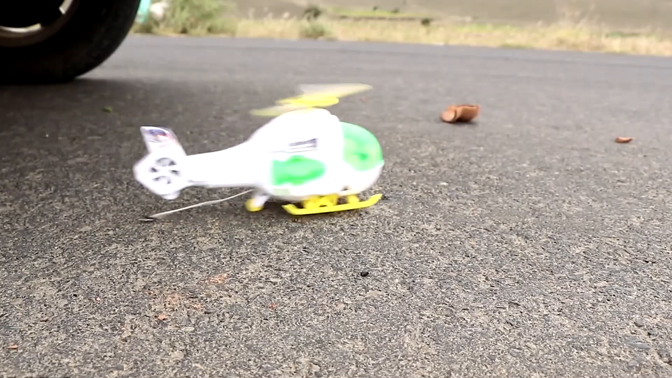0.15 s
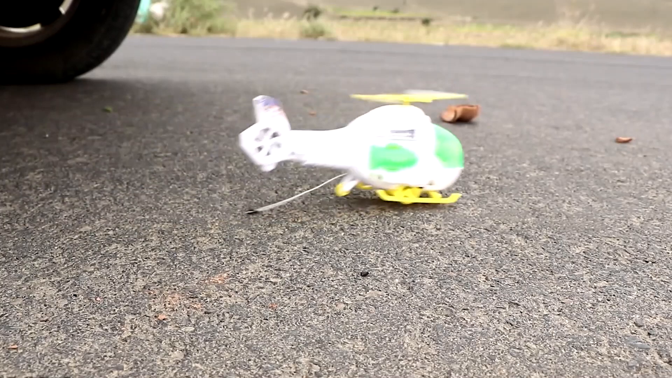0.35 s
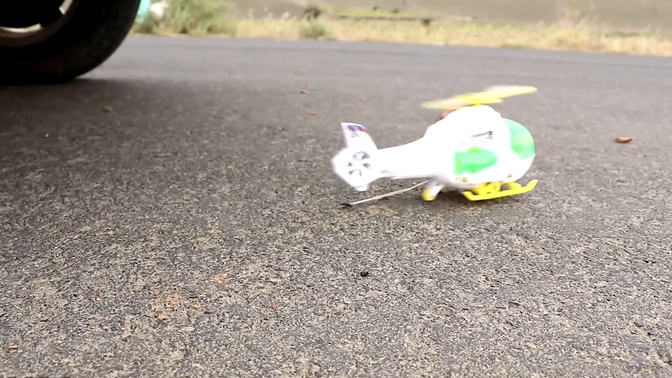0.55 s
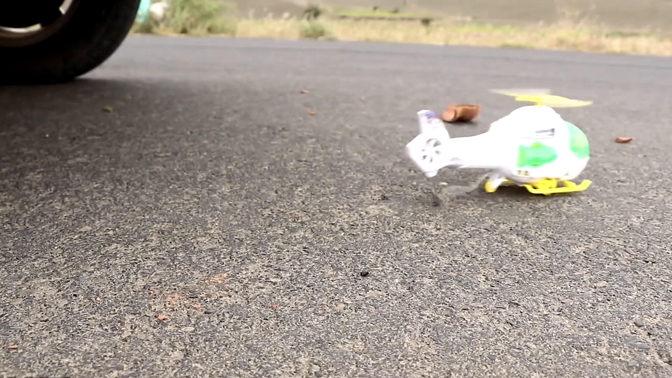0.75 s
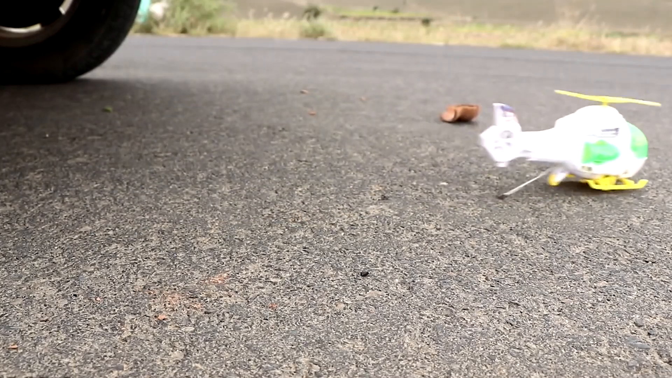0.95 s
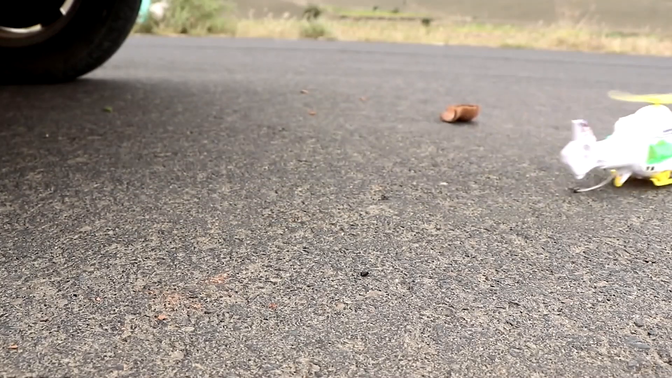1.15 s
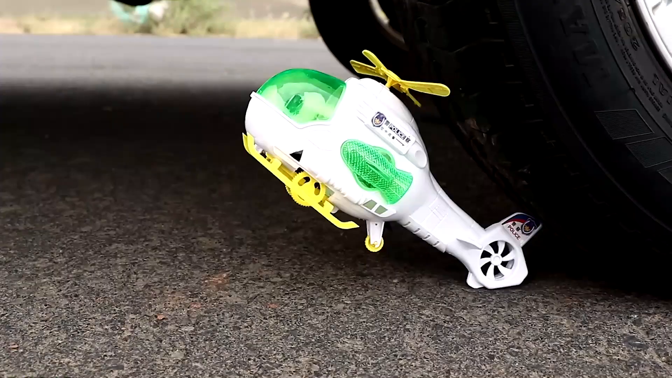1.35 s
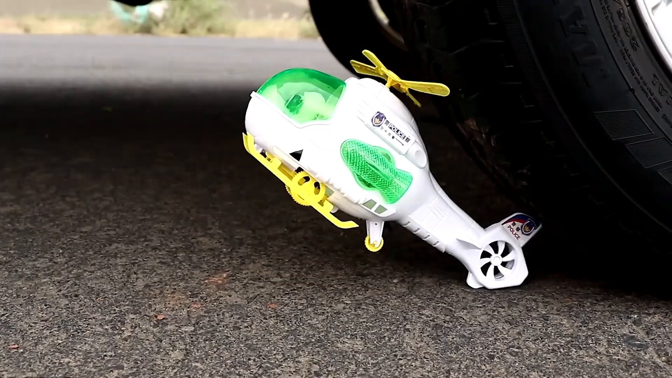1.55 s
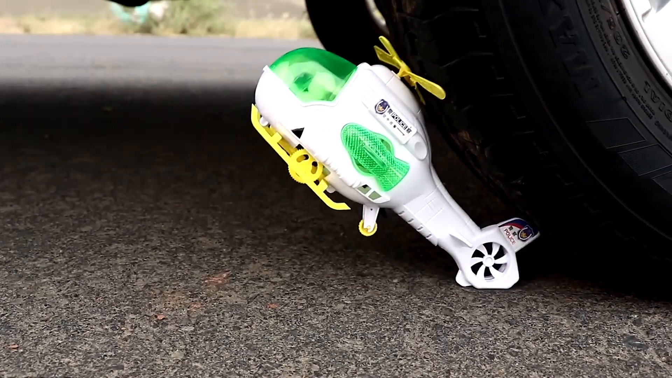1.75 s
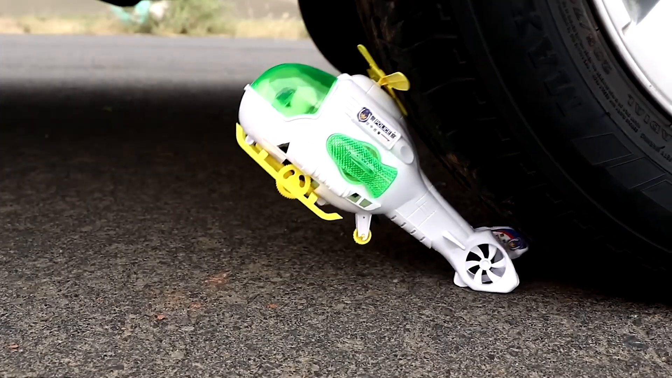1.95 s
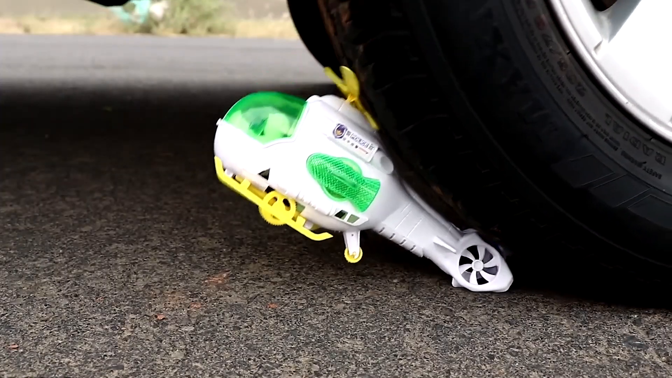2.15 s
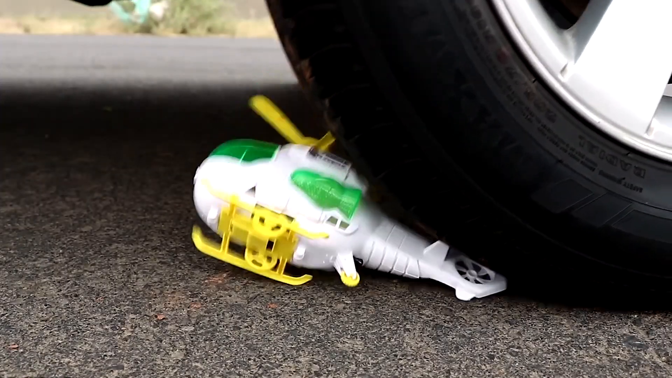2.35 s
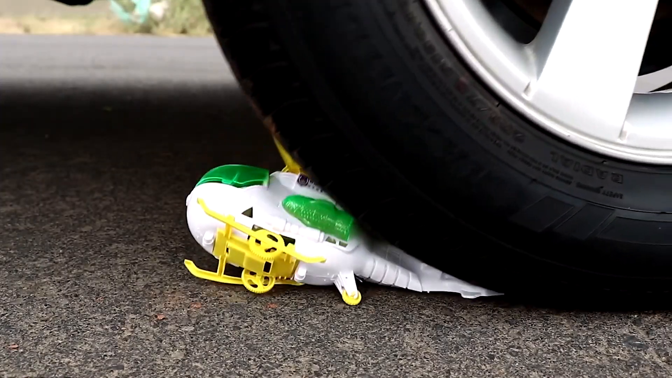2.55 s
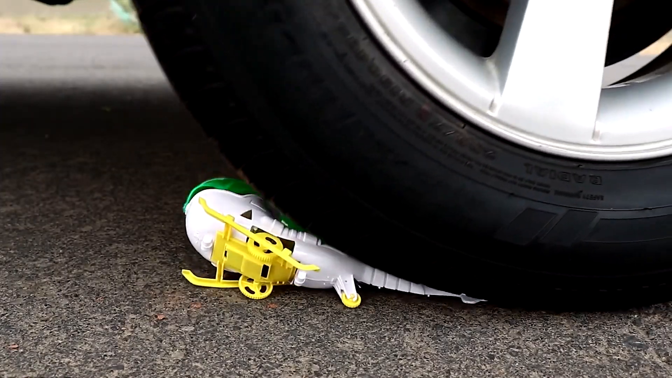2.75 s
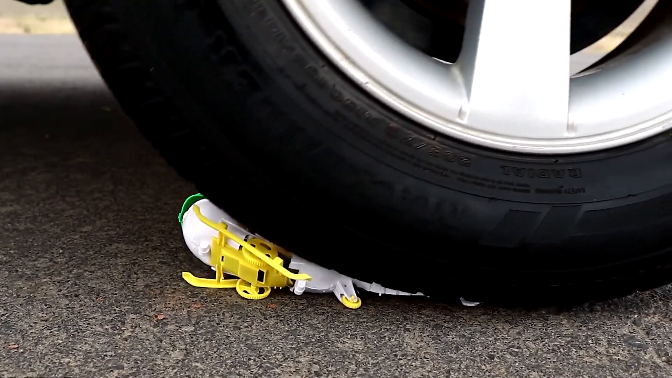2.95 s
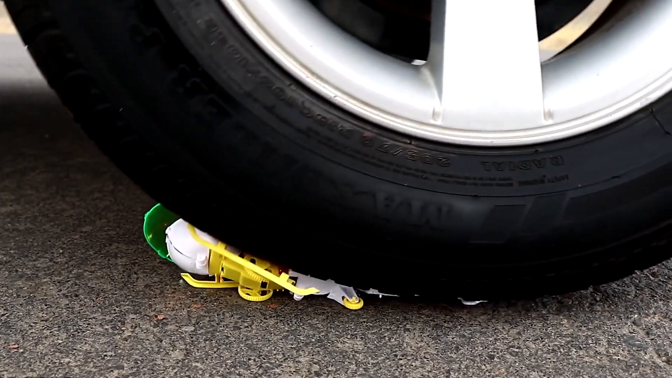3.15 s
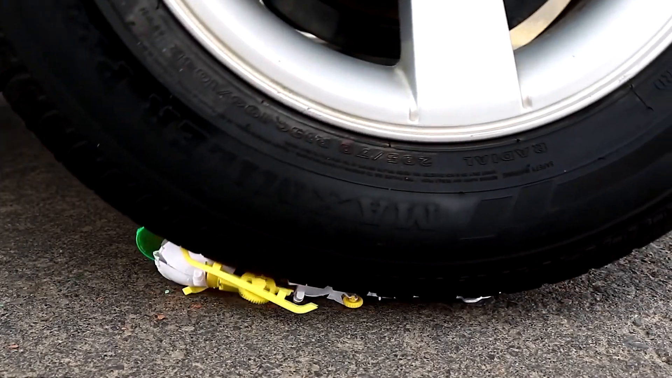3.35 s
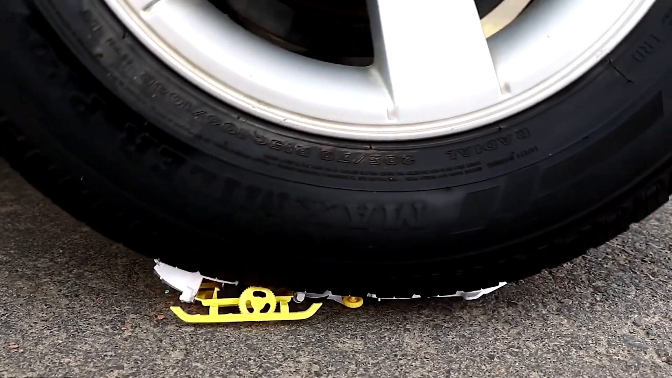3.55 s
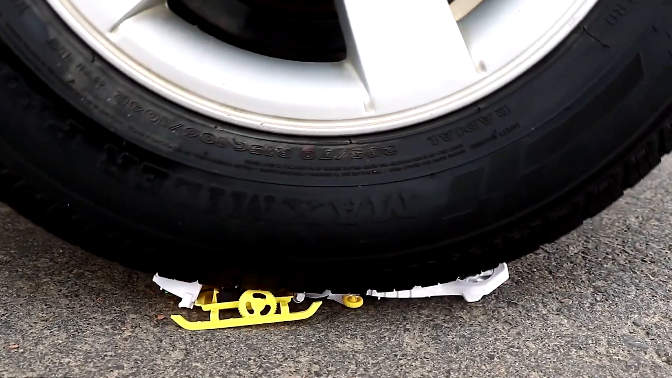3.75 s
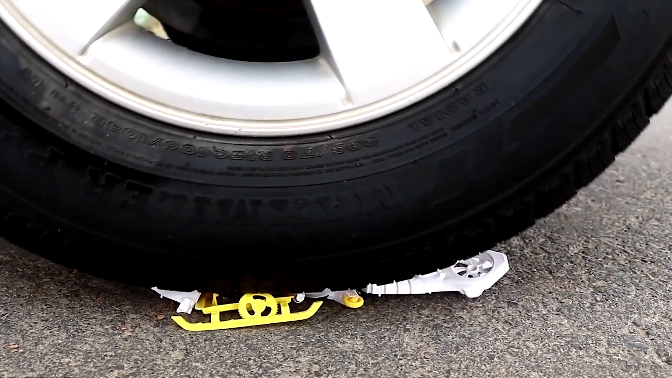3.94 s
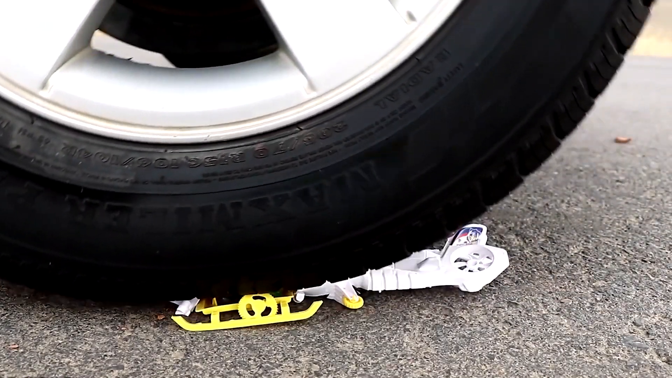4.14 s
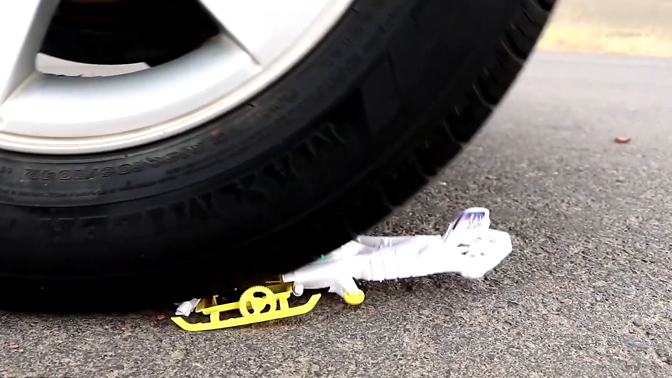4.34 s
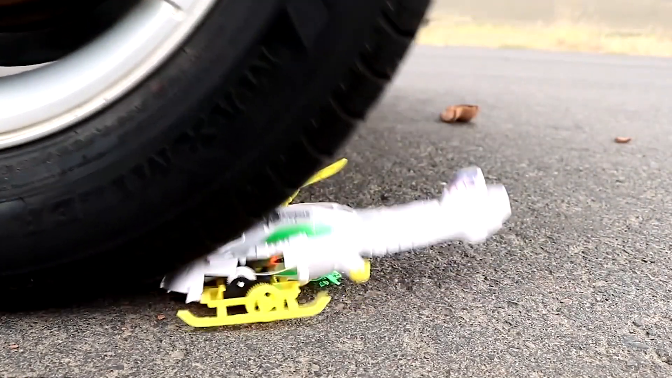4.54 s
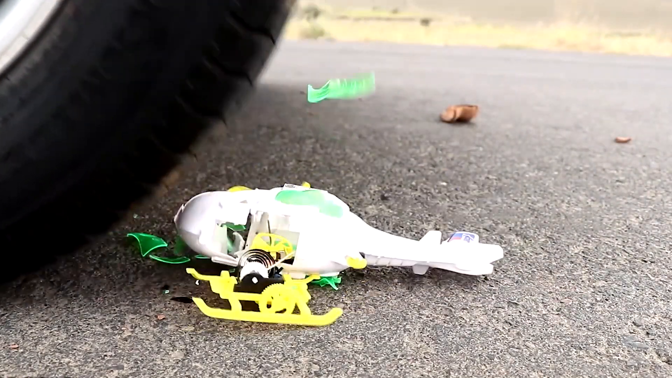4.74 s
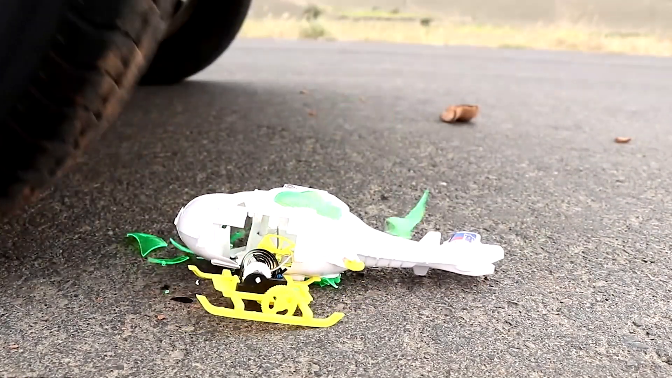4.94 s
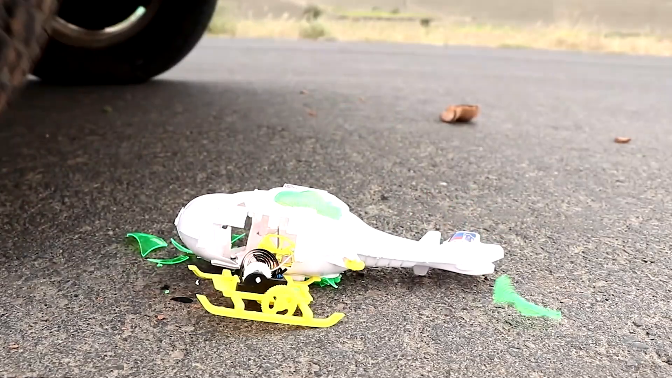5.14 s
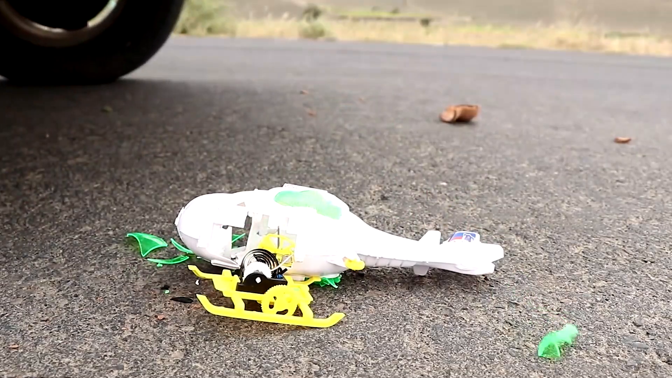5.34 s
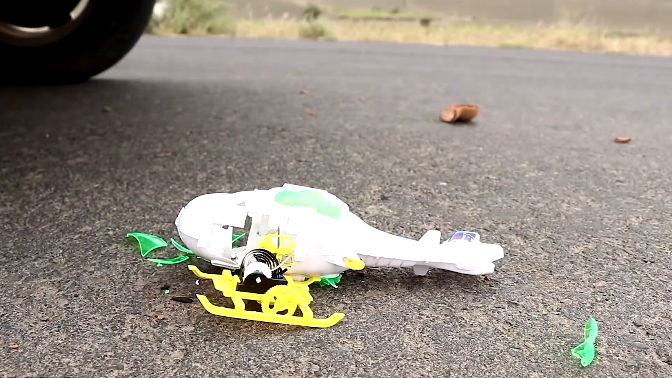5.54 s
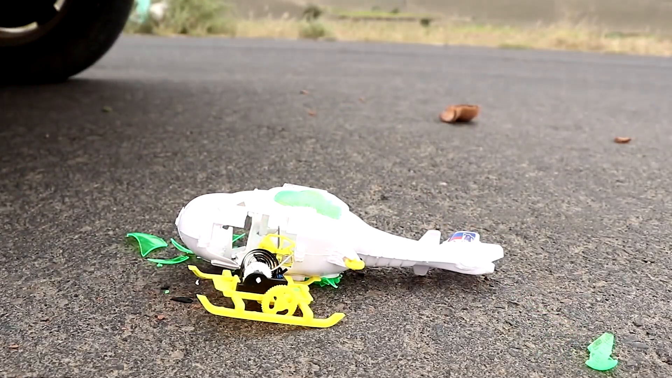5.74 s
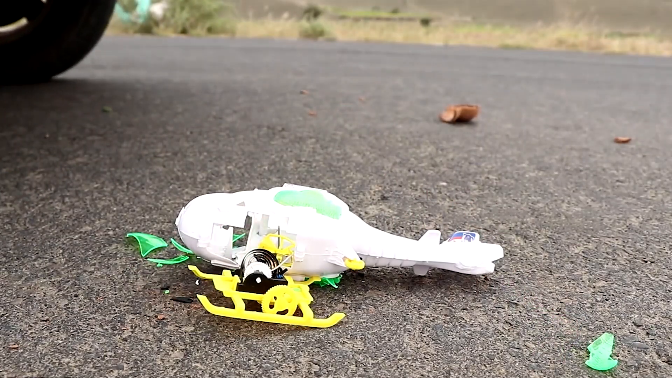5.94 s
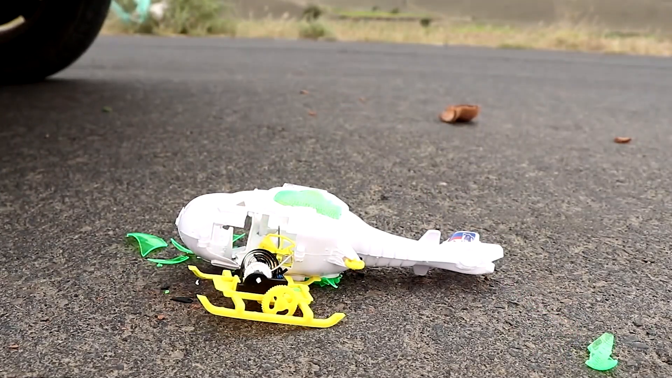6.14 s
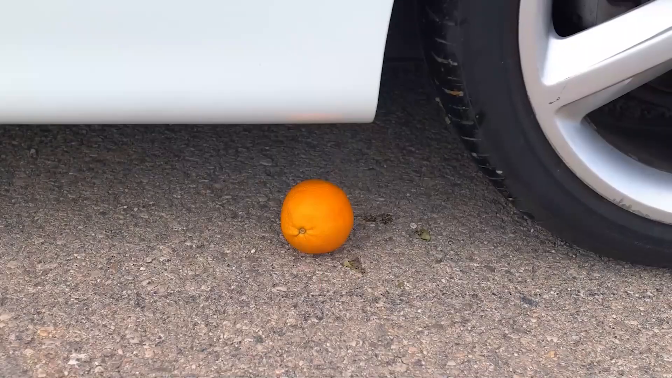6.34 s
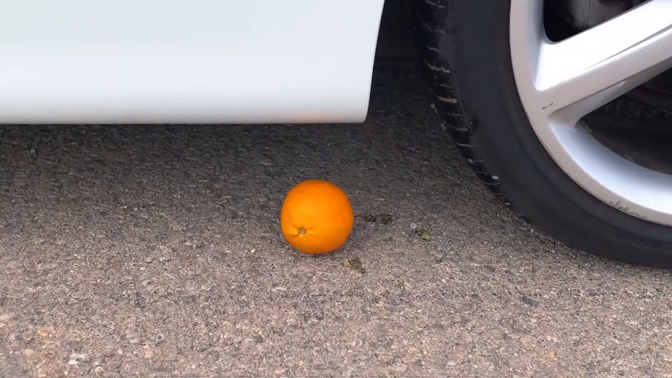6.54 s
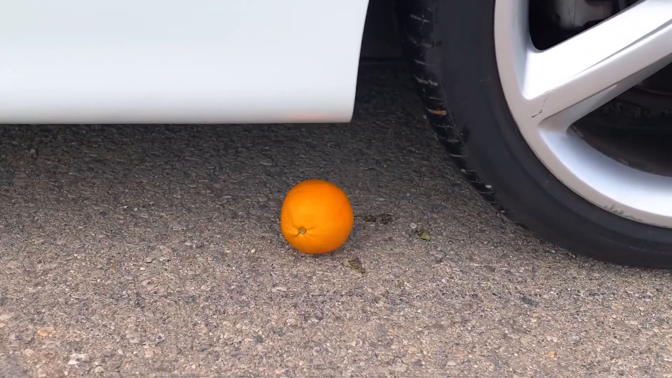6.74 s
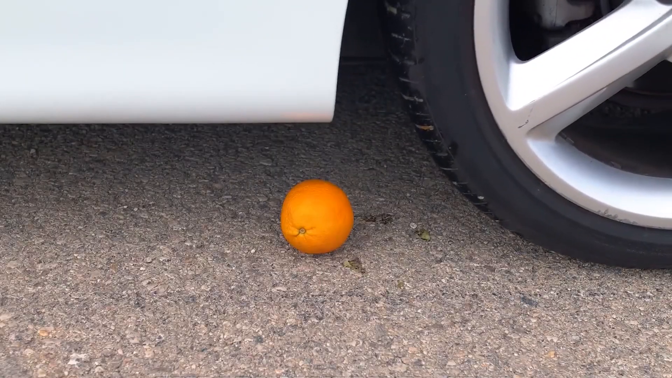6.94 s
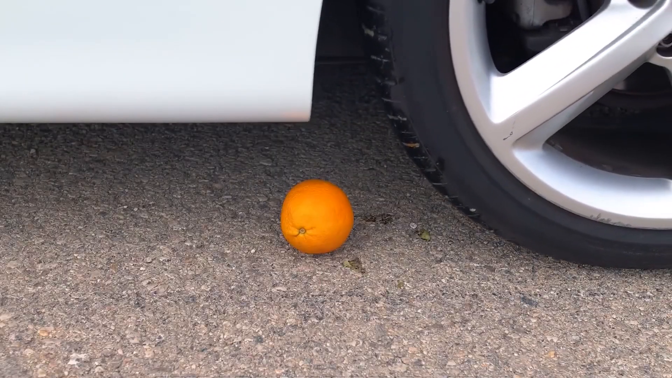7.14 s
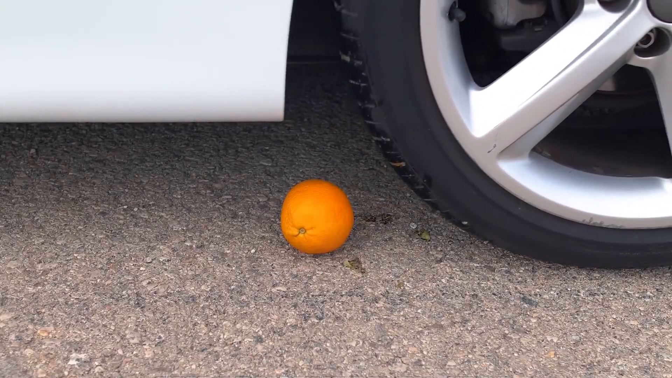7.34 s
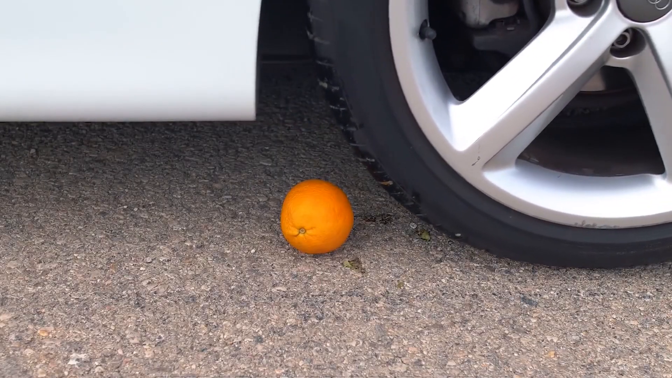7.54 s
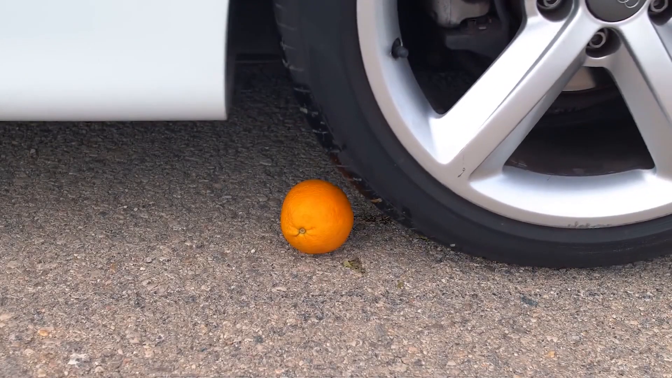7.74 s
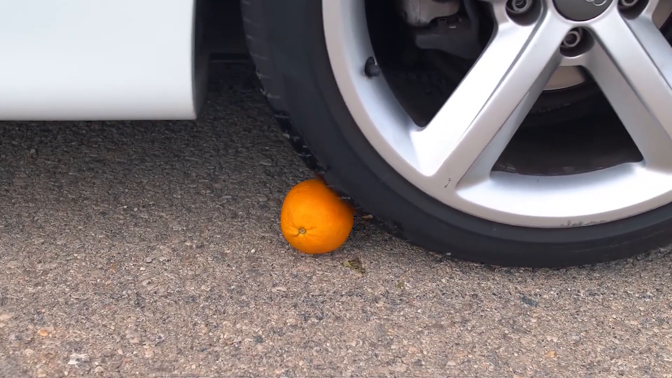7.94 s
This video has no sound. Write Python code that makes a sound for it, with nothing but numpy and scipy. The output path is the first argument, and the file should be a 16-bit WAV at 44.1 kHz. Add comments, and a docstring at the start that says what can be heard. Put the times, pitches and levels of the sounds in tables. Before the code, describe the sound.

Brittle plastic toy crunches and splinters loudly under a car wheel, loose bits ticking on the road, then a low engine hum pulls forward.

```python
"""A toy helicopter rattles and hums over asphalt in gusty air beside an idling car, and stops. The car creeps
onto it: the hollow shell cracks as noise snaps and dying modes, grinds and sheds pieces. A shard skitters off
as ringing ticks, the brake squeaks as a short sine, gusts rumble as low noise. After a sharp ringing snap in
mono comes a short silence, then a second scene: another car pulls forward. Its firing harmonics swell in over
whine and road noise, grit pops, and the firing rate sags."""
import sys
import numpy as np
from scipy import signal
from scipy.fft import rfft, irfft, next_fast_len
from scipy.io import wavfile
from scipy.ndimage import uniform_filter1d

SR = 44100
rng = np.random.default_rng(int(sys.argv[2]) if len(sys.argv) > 2 else 0)


def put_to_file(sound):
    """Save the sound as 16-bit audio at rate SR, in the file named by the first command-line argument."""
    columns = np.atleast_2d(sound).T  # one column per channel
    safe = np.clip(columns, -1, 1)
    whole_steps = np.round(safe * 32767)
    wavfile.write(sys.argv[1], SR, whole_steps.astype(np.int16))


N = 356769
TIME = np.arange(N) / SR  # s

# Cracks of the shell, and as last row a sharp mono snap just before the silence. Each row: start in seconds,
# level in dB, snap decay in seconds, # sharpness in dB (dull split below 0, thin splinter above).
CRACKS = [(1.9302, -34, 0.027, -4), (1.9715, -18.5, 0.0039, -3.5), (2.1688, -26, 0.0031, 0.5),
          (2.281, -10.5, 0.0037, 6), (2.4085, -9, 0.011, 0.5), (2.4865, -8, 0.003, -4),
          (2.5477, -7, 0.0026, 2.5), (2.6238, -6, 0.0013, -3), (2.6498, -5, 0.0042, -0.5),
          (2.6739, -3.5, 0.005, -5), (2.6845, -5, 0.0054, 3.5), (2.6922, -7, 0.0022, -3),
          (2.7095, -23, 0.0014, -2), (2.7208, -4, 0.0038, -1), (2.7484, -3.5, 0.0029, -1.5),
          (2.7741, -6.5, 0.00091, 1), (2.7833, -3.5, 0.0045, -1.5), (2.8082, -3.5, 0.0046, 6.5),
          (2.8406, 0, 0.0072, -2), (2.9088, -7, 0.00047, 0.5), (2.9288, -4, 0.0015, 1),
          (2.9487, -10.5, 0.0035, 4), (2.9884, -8, 0.0014, 0.5), (3.0483, -5, 0.0029, 8.5),
          (3.098, -1.5, 0.018, 3.5), (3.173, -1.5, 0.0013, 1), (3.203, -9.5, 0.0015, -3),
          (3.232, -9.5, 0.0072, 5), (3.2906, -1, 0.0086, 4), (3.4079, -7.5, 0.003, 3),
          (3.418, -5, 0.0024, -2), (3.4286, -8, 0.027, 2.5), (3.4594, -4.5, 0.0091, -1),
          (3.484, -2, 0.014, 6.5), (3.5629, -3.5, 0.0075, 1.5), (3.58, -13.5, 0.00059, -2.5),
          (3.6216, -12.5, 0.00071, 3.5), (3.6537, -5, 0.0034, 3), (3.6667, -5, 0.0011, 0),
          (3.7526, -16.5, 0.0025, 4.5), (3.8782, -3, 0.0037, -1), (3.963, -0.5, 0.001, 1.5),
          (3.9916, -4.5, 0.00025, 3), (4.0237, -8, 0.00067, 4.5), (4.1237, -7, 0.0085, 3.5),
          (4.162, -3.5, 0.0016, 4), (4.47, -21, 0.0025, 15), (4.4941, -14, 0.0026, -0.5),
          (4.5253, -14.5, 0.00078, 5.5), (4.7201, -19.5, 0.0058, -1), (4.9994, -24, 0.0037, -2),
          (6.29, -15.5, 0.009, 5.5)]
# Shell spectrum. Each row: frequency in Hz, relative level in dB.
SHELL_SPECTRUM = [(60, -11.5), (480, -7), (1100, -3.5), (1900, -3.5), (3300, -1.5), (4800, -7), (7500, -3),
                  (11000, -8.5), (16000, -17)]
# Modes of the buckling shell. Each entry: frequency in Hz.
SHELL_MODES_HZ = [470, 1090, 1890, 2270, 2960, 7050]
# Stretches of grinding under the tyre. Each row: start in seconds, length in seconds, level in dB.
GRINDS = [(2.426, 0.034, -21), (2.665, 0.2, -16), (3.1, 0.03, -18), (3.417, 0.06, -25), (3.986, 0.082, -33),
          (4.486, 0.071, -48), (4.689, 0.12, -37)]
# Pieces scraping on asphalt. Each row: frequency in Hz, relative level in dB.
SCRAPE_SPECTRUM = [(100, -22.5), (500, -4), (1200, 0.5), (3300, 6.5), (4800, -4), (7500, 2.5),
                   (11000, -5.5), (16000, -22)]
# Hollow knocks as the body buckles or springs back. Each row: start in seconds, level in dB.
THUDS = [(2.282, -22), (3.1, -12.5), (3.431, -16.5), (3.963, -5), (4.125, -9)]
# Loose pieces clicking on asphalt. Each row: start in seconds, level in dB.
DEBRIS = [(2.2605, -24), (2.3717, -25.5), (3.7258, -25.5), (3.8017, -24), (3.868, -28), (4.064, -22.5),
          (4.2396, -21), (4.266, -25), (4.3606, -27), (4.367, -21), (4.378, -24.5), (4.515, -17.5),
          (4.559, -26.5), (4.615, -25), (4.7835, -26)]
# Splinters springing free, and the ring of the last mono snap. Each row: start in seconds, level in dB, T60 in
# seconds, three modes in Hz.
PINGS = [(4.9994, -23, 0.033, 2030, 2690, 3100), (6.2914, -20, 0.05, 3900, 5620, 8200)]
# Knocks of the rolling toy. Each row: start in seconds, level in dB.
KNOCKS = [(0.072, -28.5), (0.198, -28.5), (0.24, -30), (0.308, -27), (0.341, -28.5), (0.399, -26.5),
          (0.586, -27), (0.639, -30), (0.833, -23.5), (0.93, -32), (0.997, -30), (1.123, -28), (1.229, -30),
          (1.288, -37), (1.354, -31), (1.402, -30.5), (1.428, -34)]
# Toy spectrum. Each row: frequency in Hz, relative level in dB.
TOY_SPECTRUM = [(100, -13), (400, -4), (1050, 1), (1700, -5.5), (3200, -10), (4800, -23.5), (8000, -21),
                (16000, -52.5)]
# Modes of the intact toy. Each entry: frequency in Hz.
BODY_MODES_HZ = [1047, 3117]
# Bounces of the shard. Each row: start in seconds, level in dB, brightness in dB.
BOUNCES = [(5.055, -45, 4.5), (5.215, -40.5, -8.5), (5.344, -51, 15), (5.361, -51, 15.5), (5.44, -58.5, 19),
           (5.696, -59, 23), (5.804, -58, 11.5)]
# Modes of the shard. Each row: frequency in Hz, relative level in dB, T60 in seconds.
SHARD_MODES = [(2990, 1, 0.08), (3690, 4.5, 0.07), (7310, -5, 0.048), (8700, 1, 0.034), (10380, 0, 0.045),
               (12200, -6.5, 0.054)]
# Resonances of the second car's exhaust. Each row: frequency in Hz, relative level in dB.
EXHAUST_SPECTRUM = [(54, -12), (108, -0.5), (160, -9), (205, -6.5), (232, -7), (256, -23), (290, -8),
                    (306, -0.5), (325, -19.5), (650, -23)]
# Second car's road noise. Each row: frequency in Hz, relative level in dB.
ROAD_SPECTRUM = [(250, -8.5), (750, -12), (1400, -12), (2700, -17.5), (6200, -22), (7800, -25),
                 (10200, -24), (11500, -32), (16000, -37.5)]
# Second car's whine. Each row: frequency in Hz, level in dB.
DRIVE_WHINE = [(1270, -49), (2012, -52.5), (5040, -59.5)]
# Grit popping under the second car. Each row: start in seconds, level in dB.
PEBBLES = [(6.951, -15), (7.355, -9.5)]
# Grit pop spectrum. Each row: frequency in Hz, relative level in dB.
POP_SPECTRUM = [(150, -22), (600, 8), (2500, -1), (4200, -32)]
# First car's low tones. Each row: frequency in Hz, level in dB.
IDLE_TONES = [(75.4, -52), (102.3, -56.5), (452, -64)]
# First car's fan whirr. Each row: frequency in Hz, relative level in dB.
WHIRR_SPECTRUM = [(25, -3), (110, -0.5), (330, -8), (450, -4), (850, -13), (1200, -8), (4800, -23.5),
                  (16000, -35)]
# First car's belt whine. Each row: frequency in Hz, level in dB.
BELT_WHINE = [(614, -57), (1125, -64.5), (1658, -61)]
# Gusts on the microphone. Each row: centre in seconds, level in dB.
GUSTS = [(.32, -38), (1.03, -36.5), (1.14, -37.5), (1.29, -35.5), (1.6, -36), (1.83, -35), (1.98, -37),
         (2.06, -35), (5.85, -41), (6.08, -37.5), (6.23, -42)]
# Stereo width. Each row: frequency in Hz, side against mid in dB.
WIDTH = [(30, -8), (200, -15.5), (1200, -6.5), (2300, -3.5), (4200, -0.5), (9000, 1)]

TOY_END_S, MONO_S, CUT_OUT_S, CUT_IN_S = 1.475, 6.285, 6.317, 6.348
EDGE_HZ = 16000
STRIKE_DB, RIPPLE_DB = 4, 3.5  # random spread of mode strengths and of crack spectra
# uneven tearing: spread in level, length of a jerk
JERK_DB, JERK_S = 4, .0012
# panels break ever smaller around the cave-in, ringing higher and brighter
CAVE_S, CAVE_SPREAD_S = 2.9, 0.35
WHOLE_PANEL_HZ, BROKEN_PANEL_HZ = 1400, 2400
WHOLE_TREBLE_DB, BROKEN_TREBLE_DB = -8, 2
SHARP_OCTAVES_PER_DB = 0.21  # sharper cracks: smaller pieces, higher ring
AFTERCRACK_SHARE, AFTERCRACK_DB = 0.59, -19.5
AFTERCRACK_MEAN_DELAY_S, AFTERCRACK_DECAY_S = 0.012, 0.0015
GRIND_ATTACK_S, GRIND_SAG_DB_PER_S, GRIND_RELEASE_S = 0.032, 47.5, 0.019
TOUCH_S, LEAVE_S, TOUCH_FADE_S, TOUCH_DB = 2.6, 4.7, 0.22, -50.5
CREASES_PER_S = 170
DEBRIS_T60_S = .014
FREE_HZ, LOADED_HZ, SAG_S, SAG_SPREAD_S = 57.6, 50.2, 7.57, 0.071  # firing rate
DRIVE_DB, SWELL_DB, SWELL_S, LOADED_DB = -34.5, -6, 0.21, -1.5
WAVER_DB, WHINE_WIDTH_HZ = .9, 20
BRAKE_S = 5.845
IDLE_DB, IDLE_NEAR_S, IDLE_FADE_DB_PER_S = -45.5, 3.06, 2
GUST_S, BREEZE_DB, BREEZE_END_S = .033, -48, 2.19


def cracks(ring_db=6, ring_width=0.41, lower_ratio=0.52, lower_db=1.5, first_db=4, first_s=0.0016,
           recoil_db=-21, recoil_s=0.017, flex_t60_s=0.013, modes_db=-24, modes_t60_s=0.05, size=2048):
    """Each fracture is a sharp snap, a short tear and a panel's recoil; the hollow shell rings on briefly."""
    out = np.zeros((2, N))
    t = np.arange(3 * size) / SR
    hz = abs(np.fft.fftfreq(size, 1 / SR))
    ripple_hz = np.geomspace(200, 16000, 170)
    for s, db, snap_s, sharp_db in CRACKS + small_cracks():
        broken = ease(s, CAVE_S, CAVE_SPREAD_S)
        panel_hz = WHOLE_PANEL_HZ * (BROKEN_PANEL_HZ / WHOLE_PANEL_HZ) ** broken
        ring_hz = panel_hz * 2 ** (SHARP_OCTAVES_PER_DB * sharp_db)
        treble_db = WHOLE_TREBLE_DB + (BROKEN_TREBLE_DB - WHOLE_TREBLE_DB) * broken + sharp_db

        first = amp(first_db) * np.exp(-t / min(first_s, snap_s))
        snap = np.maximum(np.exp(-t / snap_s), first)
        jerks = unit(uniform_filter1d(rng.standard_normal(len(t)), round(JERK_S * SR)))
        uneven = amp(JERK_DB * np.clip(jerks, -2, 1) * (1 - np.exp(-t / first_s)))
        recoil = amp(recoil_db) * np.exp(-t / recoil_s)
        envelope = np.hypot(snap, recoil) * uneven

        # dull splits lose bass and treble
        tilt = [(450, 2 * min(sharp_db, 0)), (1000, 0.0048), (2700, 0), (6500, treble_db)]
        # main mode and a lower partner
        modes = [(ring_hz, ring_db), (lower_ratio * ring_hz, lower_db)]
        panel_db = sum(peak_db / (1 + ((hz / mode_hz - 1) / ring_width) ** 2) for mode_hz, peak_db in modes)
        ripple_db = RIPPLE_DB * np.interp(hz, ripple_hz, rng.standard_normal(len(ripple_hz)))
        signs = rng.choice([-1., 1.], (2, len(t)))
        burst = colour(signs * envelope, SHELL_SPECTRUM, read(tilt, hz) + panel_db + ripple_db)
        add(out, s, amp(db) * unit(burst) * np.sqrt(np.mean(envelope ** 2)))
        add(out, s, ring([ring_hz], db, flex_t60_s))
        shell_db = db + modes_db + read(tilt, np.array(SHELL_MODES_HZ))
        add(out, s, ring(SHELL_MODES_HZ, shell_db, modes_t60_s, STRIKE_DB))
    return out * amp([[-.5], [1]])  # left, right


def small_cracks():
    """Most cracks set off a smaller one just behind them."""
    rows = []
    for (s, db, _, sharp_db), (chance, wait) in zip(CRACKS, rng.random((len(CRACKS), 2))):
        if chance < AFTERCRACK_SHARE:
            later_s = s + AFTERCRACK_MEAN_DELAY_S * (.5 + wait)
            rows.append((later_s, db + AFTERCRACK_DB, AFTERCRACK_DECAY_S, sharp_db))
    return rows


def grinding(groan_db=-5, mode_db=13, mode_width_hz=90, dull_db=-12, scrape_db=-25, follow=0.38, size=2048):
    """Slips under load make the shell groan in its modes; pieces scrape brightly even under a light touch."""
    load = tyre_load()
    hz = abs(np.fft.fftfreq(size, 1 / SR))
    modes = sum(mode_db / (1 + ((hz - mode_hz) / mode_width_hz) ** 2) for mode_hz in SHELL_MODES_HZ[1:])
    muffling = dull_db * abs(np.log2((hz + 1) / WHOLE_PANEL_HZ)).clip(0, 2)
    slips = grains(per_s=600, spread_db=4.5, decay_s=0.0018)
    rustle = grains(per_s=1100, spread_db=8, decay_s=0.0012)
    groan = amp(groan_db) * load * noise(SHELL_SPECTRUM, slips, modes + muffling)
    scrape = amp(scrape_db) * load ** follow * noise(SCRAPE_SPECTRUM, rustle)
    return groan + scrape


def tyre_load():
    """Light steady contact, plus a surge that sags and dies away each time the shell gives."""
    inside_s = np.minimum(TIME - TOUCH_S, LEAVE_S - TIME)
    load = amp(TOUCH_DB) * np.clip(1 + inside_s / TOUCH_FADE_S, 0, 1)
    for s, length_s, db in GRINDS:
        t = np.maximum(TIME - s, 0)
        held = amp(db - GRIND_SAG_DB_PER_S * t) * np.minimum(t / GRIND_ATTACK_S, 1)
        load = load + held * np.exp(-np.maximum(t - length_s, 0) / GRIND_RELEASE_S)
    return load


def crackle(level_db=-3, middle_hz=1750, t60_s=0.012):
    """Small creases pop through the loaded shell in quick succession, each with its own two pitches."""
    out, load = np.zeros((2, N)), tyre_load()
    for start, length_s, _ in GRINDS:
        for s in start + length_s * rng.random(int(length_s * CREASES_PER_S)):
            hz = middle_hz * 2 ** (rng.standard_normal(2) / 2)
            add(out, s, load[int(s * SR)] * ring(hz, level_db, t60_s, STRIKE_DB))
    return out


def thuds(low_hz=390, high_hz=530, t60_s=0.03, push_hz=170, push_db=-12, level_db=-3):
    """The whole hollow body gives a dull knock, with a soft push against the road."""
    out = np.zeros((2, N))
    for s, db in THUDS:
        knock = ring([low_hz, high_hz], db + level_db, t60_s)
        push = ring([push_hz], db + level_db + push_db, t60_s)
        add(out, s, knock + push)
    return out


def debris(ring_hz=2700, ring_db=-7, tick_s=0.0053):
    """Each loose piece ticks on the asphalt and rings briefly at four random pitches."""
    out, t = np.zeros((2, N)), TIME[:SR // 10]
    for s, db in DEBRIS:
        tick = rng.standard_normal((2, len(t))) * amp(db) * np.exp(-t / tick_s)
        add(out, s, colour(tick, SCRAPE_SPECTRUM))
        hz = ring_hz * 2 ** rng.uniform(-1.25, 1, size=4)
        add(out, s, ring(hz, db + ring_db, DEBRIS_T60_S))
    return out


def pings():
    """Splinters that spring free, and the last mono snap, ring on in three modes."""
    out = np.zeros((2, N))
    for s, db, t60_s, *modes_hz in PINGS:
        add(out, s, ring(modes_hz, db, t60_s))
    return out


def underbody(x, t60_s=0.1):
    """Scatter between the road and the car's floor: a short decaying noise tail."""
    t = TIME[:SR // 2]
    decay = 1000 ** (-t / t60_s) * (t > .005)
    tail = colour(rng.standard_normal((2, len(t))) * decay, SHELL_SPECTRUM)
    return signal.fftconvolve(x, tail / np.linalg.norm(tail[0]), axes=1)[:, :N]


def toy(clack_db=-5, clack_t60_s=0.049, knock_db=8, tick_db=-16, knock_s=0.0049, chatter_db=-42,
        hum_hz=369, hum_db=-46, hum_s=1.4):
    """Gears hum and chatter inside the plastic body, which clacks as the wheels knock over the grit."""
    knocks, clacks = np.zeros((1, N)), np.zeros((2, N))
    for s, db in KNOCKS:
        add(knocks, s, amp(db + knock_db) * np.exp(-TIME[:SR // 10] / knock_s))
        hz = np.array(BODY_MODES_HZ) * (1 + rng.standard_normal() / 10)
        add(clacks, s, ring(hz, db + clack_db + read(TOY_SPECTRUM, hz) / 2, clack_t60_s, STRIKE_DB))
    chatter = amp(chatter_db) * noise(TOY_SPECTRUM, grains(per_s=150, spread_db=3, decay_s=.0015) + .2)
    blows = rng.standard_normal((2, N)) * knocks
    bumps = colour(blows, TOY_SPECTRUM) + amp(tick_db) * colour(blows, SCRAPE_SPECTRUM)
    hum = amp(hum_db) * np.sin(2 * np.pi * hum_hz * np.cumsum(1 + 0.016 * drift(21)) / SR)
    receding = np.exp(-(TIME / hum_s) ** 2)
    return (chatter + bumps + clacks + receding * hum) * (TIME < TOY_END_S)


def second_car(road_db=-1, harmonics=11):
    """Firing harmonics slide through exhaust resonances as the rate sags; whine and road follow the level."""
    load = ease(TIME, SAG_S, SAG_SPREAD_S)
    hz = (FREE_HZ + (LOADED_HZ - FREE_HZ) * load) * (1 + 0.0024 * drift(8.4))
    swell_db = SWELL_DB * np.exp(-np.maximum(TIME - CUT_IN_S, 0) / SWELL_S)
    db = DRIVE_DB + LOADED_DB * load + swell_db
    phase = 2 * np.pi * np.cumsum(hz) / SR
    firing = np.zeros(N)
    for k in range(1, harmonics + 1):
        level = amp(read(EXHAUST_SPECTRUM, k * hz) + WAVER_DB * drift(6.4))
        firing += level * np.cos(k * phase + 2 * np.pi * rng.random())
    road = amp(road_db + db) * noise(ROAD_SPECTRUM, amp(WAVER_DB * drift(60)))
    whining = amp(db - db.max()) * (1 - load / 2) * whine(DRIVE_WHINE, WHINE_WIDTH_HZ)
    return amp(db) * np.sqrt(2) * firing + road + whining


def pebbles(decay_s=0.0011):
    """Bits of grit pop from under the second car's tread as short noise bursts."""
    out, t = np.zeros((2, N)), TIME[:SR // 10]
    for s, db in PEBBLES:
        pop = rng.standard_normal((2, len(t))) * amp(db) * np.exp(-t / decay_s)
        add(out, s, colour(pop, POP_SPECTRUM))
    return out


def shard(tick_db=6, tick_s=0.0013):
    """A stiff splinter rings at each bounce; edge-on hits tick more and ring more above 6 kHz."""
    out, t = np.zeros((2, N)), TIME[:SR // 4]
    hz, mode_db, t60_s = np.transpose(SHARD_MODES)
    for s, db, bright_db in BOUNCES:
        hiss = np.diff(rng.standard_normal((2, len(t) + 1)))
        tick = amp(tick_db + bright_db) * hiss * np.exp(-t / tick_s)
        ringing = ring(hz, mode_db + bright_db * (hz > 6000), t60_s, STRIKE_DB / 2)
        add(out, s, amp(db) * (ringing + tick))
    return out


def brake(hz=5001, db=-48, half_length_s=0.037):
    """The pad sings for a moment as the car stops: a slightly unsteady sine."""
    phase = 2 * np.pi * np.cumsum(hz * (1 + 0.0018 * drift(19.7))) / SR
    return amp(db) * np.exp(-((TIME - BRAKE_S) / half_length_s) ** 2) * np.sin(phase)


def first_car():
    """Idle: wavering low tones under fan whirr; whirr and belt whine fade as it moves on, the whine faster."""
    turns = np.cumsum(1 + 0.0022 * drift(1.9)) / SR
    tones = np.zeros(N)
    for hz, db in IDLE_TONES:
        tones += amp(db) * np.sqrt(2) * np.sin(2 * np.pi * (hz * turns + rng.random()))
    near = amp(-IDLE_FADE_DB_PER_S * np.maximum(TIME - IDLE_NEAR_S, 0))
    whirr = amp(IDLE_DB) * near * noise(WHIRR_SPECTRUM)
    return tones * amp(drift(9.3)) + whirr + near ** 2 * whine(BELT_WHINE, WHINE_WIDTH_HZ)


def whine(lines, width_hz):
    """Fuzzy tones: a narrow band of noise around each line."""
    out = np.zeros(N)
    for hz, db in lines:
        angle = 2 * np.pi * hz * TIME
        out += amp(db) * (drift(width_hz) * np.cos(angle) + drift(width_hz) * np.sin(angle))
    return out


def wind():
    """Short lumpy puffs of low rumble over an early light breeze, independent at each microphone port."""
    puffs = sum(amp(db) * np.exp(-((TIME - s) / GUST_S) ** 2) for s, db in GUSTS)
    breeze = amp(BREEZE_DB) * (1 - ease(TIME, BREEZE_END_S, GUST_S))
    rumble = [(30, 8.5), (170, 6.5), (450, -9), (3000, -44)]  # Hz, relative dB
    ports = [noise(rumble, amp(2 * drift(58)))[0] for _ in range(2)]
    return np.hypot(puffs, breeze) * np.array(ports)


def ring(hz, db, t60_s, strike_db=0):
    """Dying modes, left and right; each blow shares out strength and phase differently."""
    t = TIME[:SR // 4]
    hz, db, t60_s = np.array(np.broadcast_arrays(hz, db, t60_s), float)[:, :, None]
    struck = amp(db + strike_db * np.clip(rng.standard_normal(hz.shape), -2, 1))
    spread = amp(read(WIDTH, hz)) * rng.standard_normal((2, *hz.shape))
    phase = 2 * np.pi * rng.random(hz.shape) + spread
    return (struck * 1000 ** (-t / t60_s) * np.sin(2 * np.pi * hz * t + phase)).sum(1)


def grains(per_s, spread_db, decay_s):
    """Envelope of many tiny random snaps of uneven size."""
    sizes = amp(spread_db * np.minimum(rng.exponential(1, N), 4))
    snaps = sizes * (rng.random(N) < per_s / SR)
    power = signal.lfilter([1], [1, -np.exp(-2 / (decay_s * SR))], snaps ** 2)
    return np.sqrt(unit(power))


def noise(spectrum, envelope=1, extra_db=0):
    """Stereo noise with a given spectrum, rms 1."""
    return unit(colour(rng.standard_normal((2, N)) * envelope, spectrum, extra_db))


def colour(x, spectrum, extra_db=0, size=2048):
    """Minimum-phase filter on a (mid, side) pair, giving left and right."""
    hz = abs(np.fft.fftfreq(size, 1 / SR))
    mid_db = read(spectrum, hz) + extra_db
    log_gain = np.log(amp([mid_db, mid_db + read(WIDTH, hz)]))
    taps = np.fft.ifft(np.exp(np.conj(signal.hilbert(log_gain)))).real
    mid, side = signal.fftconvolve(x, taps, axes=1)[:, :x.shape[1]]
    return np.array([mid + side, mid - side])


def drift(width_hz):
    """Random wander of rms 1: Gaussian low-passed noise."""
    size = next_fast_len(N, True)
    lowpass = np.exp(-(np.fft.rfftfreq(size, 1 / SR) / width_hz) ** 2)
    return unit(irfft(rfft(rng.standard_normal(size)) * lowpass, size)[:N])


def ease(t, middle_s, spread_s):
    """Smooth step from 0 to 1."""
    return .5 + .5 * np.tanh((t - middle_s) / (2 * spread_s))


def read(points, hz):
    """Interpolates a table on a log-frequency axis."""
    f, value = np.transpose(points)
    return np.interp(np.log(hz + 1), np.log(f), value)


def amp(db):
    """Decibels to gain."""
    return 10 ** (np.asarray(db) / 20)


def unit(x):
    """Scales to rms 1."""
    return x / np.sqrt(np.mean(x ** 2) + 1e-20)


def add(mix, s, sound):
    """Mixes a sound in at time s."""
    part = mix[:, max(round(s * SR), 0):][:, :sound.shape[-1]]
    part += sound[..., :part.shape[1]]


def scene():
    """The crushing in stereo, mono for the last snap; a short silent gap, then the second car in mono."""
    plastic = cracks() + grinding() + crackle() + thuds() + debris() + pings()
    scatter = amp(-18.5) * underbody(plastic)
    crush = plastic + scatter + toy() + shard() + brake() + first_car() + wind()
    crush = np.where(TIME < MONO_S, crush, crush.mean(axis=0))
    drive = (second_car() + pebbles()).mean(axis=0)
    return crush * (TIME < CUT_OUT_S) + drive * (TIME > CUT_IN_S)


def record(dry):
    """Peaks overload softly; then a steep low-pass."""
    limited = dry / (1 + (dry / .87) ** 4) ** (1 / 4)
    lowpass = signal.firwin(255, EDGE_HZ, window=("kaiser", 8), fs=SR)
    return signal.oaconvolve(limited, lowpass[None], "same")


dry = scene()
out = record(dry)
put_to_file(out)
```